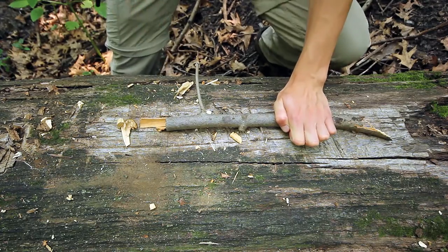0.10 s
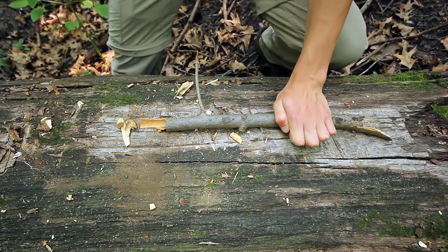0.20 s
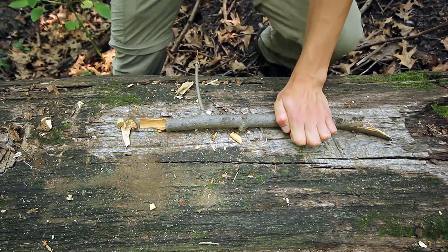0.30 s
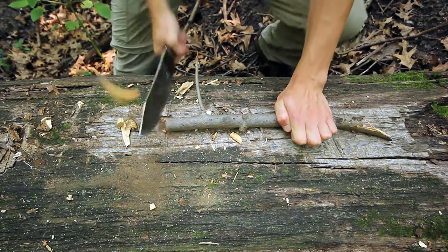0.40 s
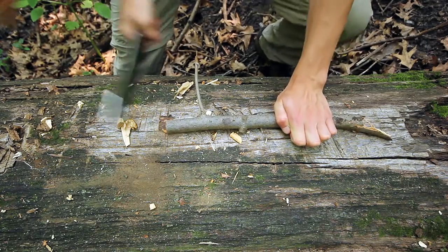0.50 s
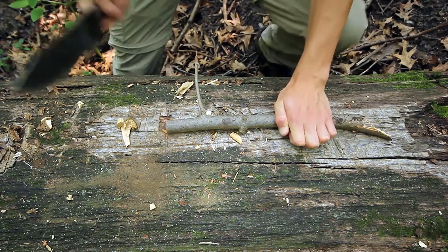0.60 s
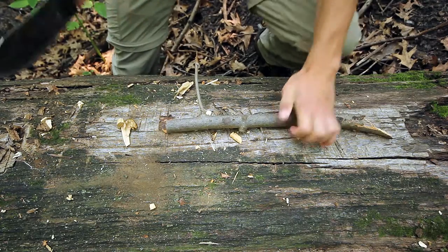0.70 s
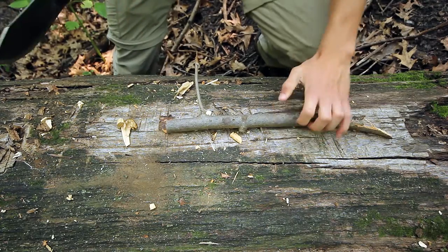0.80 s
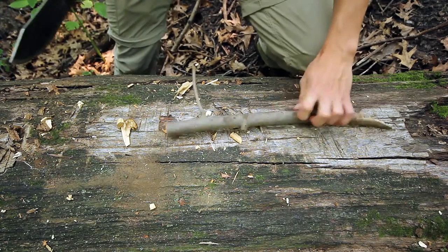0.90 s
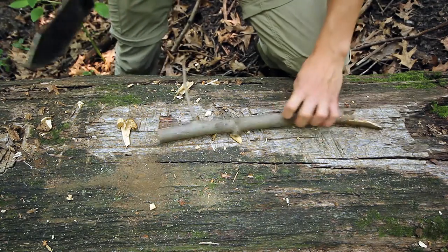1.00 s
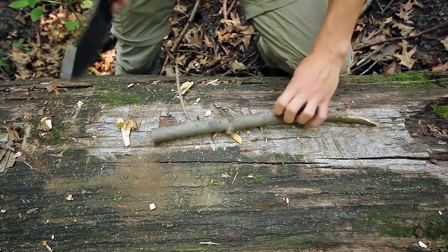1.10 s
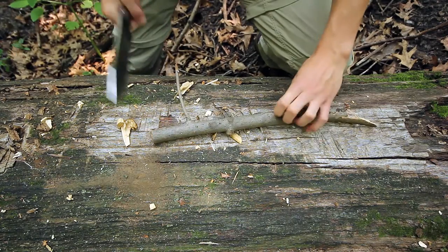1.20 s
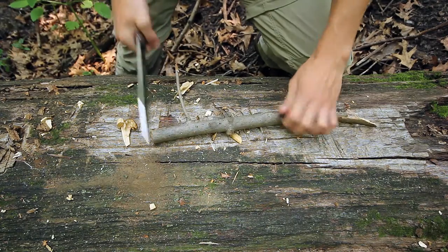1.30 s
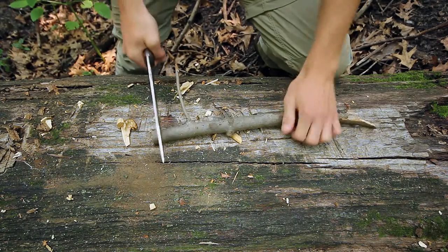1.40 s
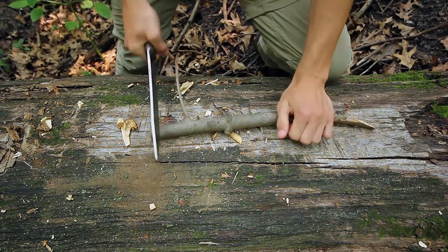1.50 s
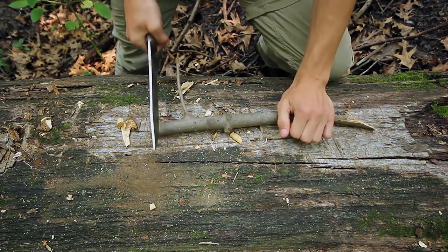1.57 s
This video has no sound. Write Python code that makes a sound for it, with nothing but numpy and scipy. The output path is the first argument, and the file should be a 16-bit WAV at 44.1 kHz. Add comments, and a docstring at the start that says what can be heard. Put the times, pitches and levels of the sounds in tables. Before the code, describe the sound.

A heavy knife chops once through a thin stick on a log, water trickling nearby.

```python
"""Water trickles nearby: a soft wash, a fizz of tiny ringing bubbles, drips and splashes.
Short sharp ticks sound, many with a drip, and a light knock rings wood. Then a heavy knife chops
through a thin stick on a log: the blade chatters through the fibres, and stick and log ring.
The chop overloads the close microphone; the gain control dips the water after it."""
import sys
import numpy as np
from scipy import signal
from scipy.io import wavfile
from scipy.ndimage import uniform_filter1d

SR = 44100
rng = np.random.default_rng(int(sys.argv[2]) if len(sys.argv) > 2 else 0)


def generate_wav(signal):
    """Clip the signal to [-1, 1] and save it as 16-bit WAV at the path in sys.argv[1]."""
    frames = np.transpose(np.atleast_2d(signal))
    scaled = np.clip(frames, -1, 1) * 32767
    pcm = np.round(scaled).astype(np.int16)
    wavfile.write(sys.argv[1], SR, pcm)


N = 70560
SPRAY_TOP_HZ = 6850


def amp(db):
    return 10 ** (np.asarray(db) / 20)


def decay(t, t60_s):
    return amp(-60 * t / t60_s)


def unit_rms(x):
    return x / np.sqrt(np.mean(x ** 2) + 1e-20)


def curve_at(points, hz):
    f, value = np.transpose(points)
    return np.interp(np.log(hz + 1), np.log(f + 1), value)


def add(mix, start_s, sound):
    part = mix[round(start_s * SR):][:len(sound)]
    part += sound[:len(part)]


def butter(x, hz, kind):
    return signal.lfilter(*signal.butter(2, hz, kind, fs=SR), x)


def band_noise(n, low_hz, high_hz):
    return butter(butter(rng.standard_normal(n), low_hz, "high"), high_hz, "low")


def wash():
    """Running water: soft noise with drifting patches in its spectrum."""
    # f/Hz, relative spectral density/dB
    spectrum = [(18, -45), (30, 1.5), (100, -10.5), (194, -12), (252, -11), (280, -5.5), (374, -14),
                (702, -6), (889, -7), (988, -20.5), (1540, -4), (1810, -16.5), (1960, -5.5), (8080, -18.5),
                (16000, -32.5)]
    hz = np.fft.rfftfreq(1024, 1 / SR)
    real, imag, patches = rng.standard_normal((3, len(hz), N // 256 + 5))
    patches = uniform_filter1d(patches, size=14, axis=0)
    patches_db = 2 * unit_rms(uniform_filter1d(patches, size=5, axis=1))
    frames = (real + 1j * imag) * amp(curve_at(spectrum, hz)[:, None] + patches_db)
    return amp(-40) * unit_rms(signal.istft(frames, nperseg=1024, noverlap=768)[1][:N])


def fizz():
    """Many tiny bubbles ring for a few cycles each, a few of them loud."""
    # f/Hz, bubble weight/dB
    weights = [(400, -7.5), (800, 0.5), (1500, 0), (2400, 5), (4500, -5.5), (7000, 1), (12000, -20.5),
               (15500, -29)]
    # flow: t/s, low-bubble level/dB, high-bubble level/dB
    flow = [(0.0, -46, -51), (0.284, -39.5, -47.5), (0.48, -39.5, -44), (0.748, -41, -52.5),
            (0.94, -43, -49.5), (1.086, -43.5, -49.5), (1.386, -40.5, -51), (1.6, -40.5, -40)]
    rate_per_s, spread_db, cycles, split_hz = 2500, 3, 5.8, 5000
    strength = amp(spread_db * np.minimum(rng.exponential(1, N), 4))
    births = strength * (rng.random(N) < rate_per_s / SR)
    pitch_index = rng.integers(0, 40, N)
    t = np.arange(1500) / SR
    bands = np.zeros((2, N))
    for k, hz in enumerate(np.geomspace(400, 15500, num=40)):
        age = t * hz / cycles
        envelope = age * np.exp(-4 * age) * np.sqrt(hz) * amp(curve_at(weights, hz))
        bubble = envelope * np.sin(2 * np.pi * hz * t * (1 + 0.019 * age))
        bands[int(hz > split_hz)] += signal.oaconvolve(births * (pitch_index == k), bubble)[:N]
    times_s, *levels_db = np.transpose(flow)
    gains = [amp(np.interp(np.arange(N) / SR, times_s, db)) for db in levels_db]
    return sum(unit_rms(band) * gain for band, gain in zip(bands, gains))


def drips():
    """Each drop ticks, then rings a slightly rising bubble, blurred by spray."""
    # t/s, level/dB, f/Hz, t60/s
    drops = [(0.014, -30, 2386, 0.06), (0.053, -30.5, 2180, 0.011), (0.09, -35, 2276, 0.066),
             (0.156, -36, 2540, 0.028), (0.252, -25, 2540, 0.019), (0.309, -36, 2340, 0.044),
             (0.355, -45, 2380, 0.021), (0.377, -28.5, 2640, 0.047), (0.72, -33, 2300, 0.048),
             (0.77, -35, 2080, 0.028), (0.849, -29, 1550, 0.026), (0.872, -35, 2320, 0.03),
             (0.922, -34, 1655, 0.058), (0.929, -34.5, 6460, 0.057), (0.948, -26, 1500, 0.018),
             (0.953, -36, 1493, 0.083), (0.976, -33, 2300, 0.018), (0.992, -28, 1760, 0.063),
             (1.027, -35.5, 593, 0.12), (1.096, -30, 2166, 0.082), (1.138, -30, 2900, 0.09),
             (1.17, -35, 1540, 0.05), (1.214, -23, 2840, 0.0086), (1.2645, -21.5, 2860, 0.022),
             (1.267, -31, 920, 0.07), (1.308, -30.5, 3150, 0.02), (1.34, -27.5, 2300, 0.063),
             (1.351, -31.5, 1750, 0.063), (1.406, -31.5, 1530, 0.023), (1.44, -39, 620, 0.088),
             (1.539, -29, 2220, 0.042), (1.576, -32.5, 2120, 0.042), (1.595, -28.5, 2700, 0.037),
             (0.087, -27.5, 2680, 0.011), (.2125, -33, 5800, 0.05), (.2543, -25, 6040, 0.011),
             (1.21, -36.5, 770, 0.035), (0.22, -46, 6880, 0.027), (0.24, -31, 2720, 0.018),
             (.4185, -18.5, 5670, 0.0092), (0.17, -34, 505, 0.021), (1.341, -31.5, 2980, 0.035),
             (1.4572, -29.5, 6300, 0.014), (1.425, -35.5, 345, 0.073)]
    glide_per_t60, rise_s, snap = 0.054, 0.00061, 0.71
    t = np.arange(2000) / SR
    mix = np.zeros(N)
    for start_s, db, hz, t60_s in drops:
        bubble = np.sin(2 * np.pi * hz * t * (1 + glide_per_t60 * t / t60_s))
        blur = 0.47 * unit_rms(band_noise(len(t), hz / 1.04, hz * 0.63))
        envelope = np.minimum(t / rise_s, 1) * (decay(t, t60_s) + snap * decay(t, 0.0067))
        tick = amp(-6) * butter(rng.standard_normal(len(t)), SPRAY_TOP_HZ, "low") * decay(t, 0.0032)
        add(mix, start_s, amp(db) * ((bubble + blur) * envelope + tick))
    return mix


def splashes():
    """Lumpy bursts of spray."""
    # t/s, level/dB, decay time/s, low cut/Hz
    bursts = [(0.064, -35, 0.015, 1520), (0.107, -37.5, 0.0074, 4000), (0.286, -35, 0.023, 2000),
              (0.308, -33.5, 0.017, 3040), (0.38, -34.5, 0.031, 1470), (0.702, -36, 0.015, 790),
              (0.922, -32.5, 0.003, 5070), (0.951, -32, 0.013, 3100), (1.025, -30.5, 0.016, 2520),
              (1.086, -37, 0.037, 1510), (1.133, -41, 0.063, 1500), (1.212, -33.5, 0.0099, 1010),
              (1.273, -38.5, 0.017, 2980), (1.439, -30.5, 0.011, 2500), (1.469, -36, 0.009, 2500),
              (0.236, -35.5, 0.029, 1190), (0.47, -35, 0.058, 500), (1.059, -37.5, 0.015, 3500),
              (1.161, -36, 0.017, 2500), (0.219, -32.5, 0.026, 1517), (1.565, -41.5, 0.03, 1500)]
    t = np.arange(4000) / SR
    mix = np.zeros(N)
    for start_s, db, decay_s, low_hz in bursts:
        spray = band_noise(len(t), low_hz, SPRAY_TOP_HZ)
        lumps_db = 3.5 * unit_rms(uniform_filter1d(rng.standard_normal(len(t)), size=110))
        age = t / decay_s
        envelope = np.minimum(age / 0.17, 1) * np.exp(-age ** 2)
        add(mix, start_s, amp(db) * unit_rms(spray * amp(lumps_db)) * envelope)
    return mix


def sharp_ticks():
    """Short sharp ticks, many at the start of a drip: a ring of a cycle or two with a bright crack."""
    # t/s, ring level/dB, f/Hz, crack level/dB
    ticks = [(.1888, -24, 1150, -45), (.1904, -23, 680, -33), (.1967, -22, 1500, -36),
             (.2245, -26, 900, -27), (.3782, -22, 2700, -36), (.9237, -20, 1500, -36),
             (.9549, -30, 1500, -28), (.9912, -18, 1700, -42), (1.1385, -21, 2900, -38),
             (1.1705, -23, 1600, -38), (1.2638, -14, 2600, -40), (1.3408, -24, 2400, -45),
             (1.0898, -30, 2500, -33), (1.1055, -28, 7500, -34), (1.1463, -24, 3500, -36),
             (1.1603, -25, 8000, -40), (1.2058, -27, 6000, -32), (1.2795, -26, 7500, -36),
             (1.3695, -27, 10500, -36), (1.4238, -22, 4500, -38), (1.4425, -26, 640, -31)]
    t60_cycles = 5
    t = np.arange(1000) / SR
    mix = np.zeros(N)
    for start_s, db, hz, crack_db in ticks:
        ring = -amp(db + 3) * decay(t, t60_cycles / hz) * np.sin(2 * np.pi * hz * t)
        crack = amp(crack_db) * band_noise(len(t), 4000, 11000) * decay(t, 0.008)
        add(mix, start_s, ring + crack)
    return mix


def struck_wood(modes, level_db, tilt_db_per_oct, crack_db):
    """A sharp push rings the wood's modes, with a crack of noise."""
    rise_cycles = 0.21
    t = np.arange(4000) / SR
    ring = np.zeros(len(t))
    for hz, db, t60_s in modes:
        envelope = (1 - np.exp(-t * hz / rise_cycles)) * decay(t, t60_s)
        ring += amp(db + tilt_db_per_oct * np.log2(hz / 1000)) * envelope * np.sin(2 * np.pi * hz * t)
    crack = band_noise(len(t), 1500, 8000) * decay(t, 0.012)
    return amp(level_db) * ring + amp(crack_db) * crack


def knock():
    """A light blow on a smaller piece of wood."""
    # f/Hz, level/dB, t60/s
    modes = [(520, -24, .035), (660, -17, .04), (870, -19, .025), (1180, -18, .025), (1450, -16, .025),
             (1945, -11, .03), (2250, -14, .02), (2950, -12, .012), (3550, -1, .006), (3950, -7, .008),
             (6000, -12, .008), (8300, -12, .008), (10100, -14, .01), (12400, -22, .008)]
    mix = np.zeros(N)
    add(mix, start_s=0.2206, sound=struck_wood(modes, level_db=-6.5, tilt_db_per_oct=0, crack_db=-14))
    return mix


def blade_bite():
    """Stick-slip chatter through the fibres; its rate arches up and down."""
    # t/s, chatter f/Hz, level/dB
    cut = [(.43765, 2300, 5), (.4381, 4500, 5), (.4388, 5700, 5), (.4396, 4700, 2), (.4399, 4500, -6)]
    times_s, hz, db = np.transpose(cut)
    t = np.arange(times_s[0], times_s[-1], 1 / SR)
    chatter = np.sin(2 * np.pi * np.cumsum(np.interp(t, times_s, hz)) / SR)
    grit = 0.34 * rng.standard_normal(len(t))
    mix = np.zeros(N)
    add(mix, times_s[0], amp(np.interp(t, times_s, db)) * (chatter + grit))
    return mix


def chop():
    """The knife's blows ring stick and log."""
    # t/s, level/dB, tilt about 1 kHz/(dB/octave), crack level/dB
    blows = [(.43978, 4, 0, -3), (.4414, -2, 1, -9), (.4642, -24, 2, -38)]
    # f/Hz, level/dB, t60/s
    modes = [(400, -13, .03), (460, -11, .03), (722, 2, .016), (820, -10, .02), (1130, -5.5, .02),
             (1400, -19, .02), (1650, -9, .018), (2060, -8, .02), (2720, 2, .015), (3780, -6, .012),
             (3980, -19, .035), (4250, -15, .015), (5650, -13, .014), (7300, -14, .012), (7880, -13, .012),
             (9000, -27, .022)]
    mix = np.zeros(N)
    for start_s, *blow in blows:
        add(mix, start_s, struck_wood(modes, *blow))
    return mix


def scatter(x):
    """Short diffuse tail off log and ground; each band dies at its own rate."""
    # f/Hz, t60/s
    decay_times = [(200, 0.19), (700, 0.098), (2500, 0.1), (5000, 0.062), (10000, 0.058)]
    hz, t, frames = signal.stft(rng.standard_normal(8192), SR, nperseg=128)
    tail = signal.istft(frames * decay(t, curve_at(decay_times, hz)[:, None]), SR, nperseg=128)[1]
    return signal.fftconvolve(x, tail / np.linalg.norm(tail))[:N]


def scene():
    """Water, ticks and wood in mono; all but the wash pass the microphone's low cut."""
    water = fizz() + drips() + splashes()
    transients = butter(sharp_ticks() + knock() + blade_bite() + chop(), 330, "high")
    close = water + transients + amp(-15) * scatter(transients)
    return (wash() + butter(close, 292, "high"))[None]


def record(dry):
    """Input clip, late gain control with slow recovery, rumble filter, second clip, band limit."""
    threshold_db, duck_db_per_db, recovery_db_per_s, lag_s = -20, 0.4, 40, 0.0052
    rumble_hz, top_hz = 160, 16200
    clipped = np.clip(dry, -1, 1)
    power = uniform_filter1d(clipped[0] ** 2, size=131, origin=65)
    power_db = 10 * np.log10(abs(power) + 1e-12)
    recovery_db = np.arange(N) * recovery_db_per_s / SR
    held_db = np.maximum.accumulate(power_db + recovery_db) - recovery_db
    over_db = np.maximum(held_db - threshold_db, 0)
    late_db = uniform_filter1d(np.r_[np.zeros(round(lag_s * SR)), over_db][:N], size=20)
    ducked = butter(clipped / amp(duck_db_per_db * late_db), rumble_hz, "high")
    taps = signal.firwin(511, top_hz, window=("kaiser", 9), fs=SR)
    return signal.oaconvolve(np.clip(ducked, -1, 1), taps[None], "same")


dry = scene()
out = record(dry)
generate_wav(out)
```